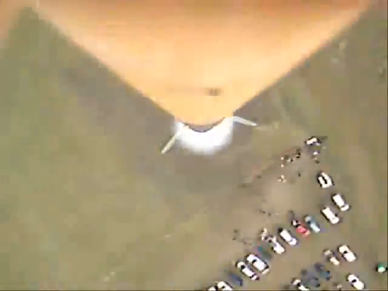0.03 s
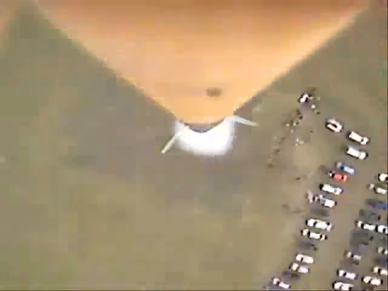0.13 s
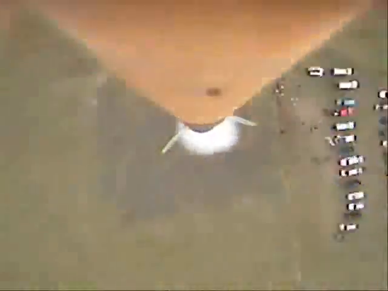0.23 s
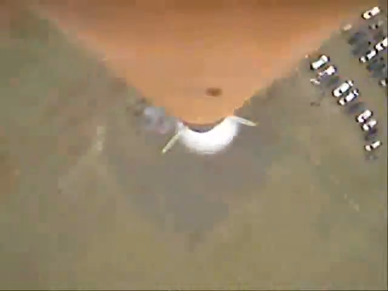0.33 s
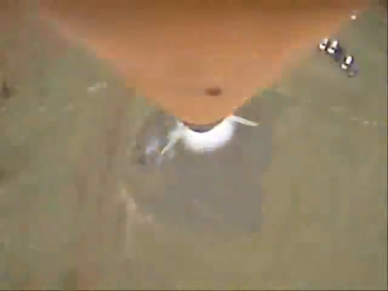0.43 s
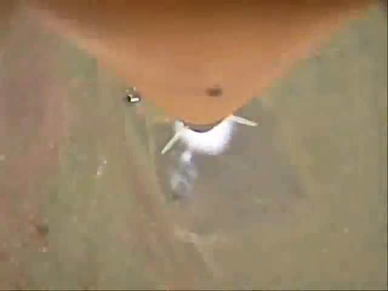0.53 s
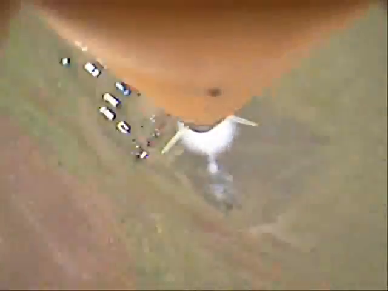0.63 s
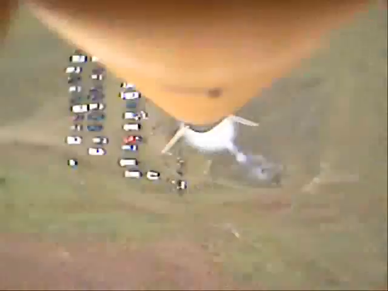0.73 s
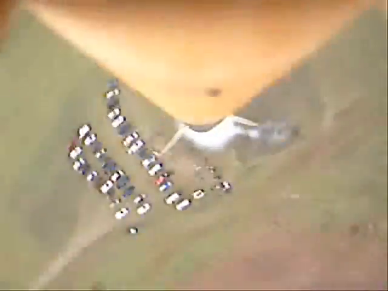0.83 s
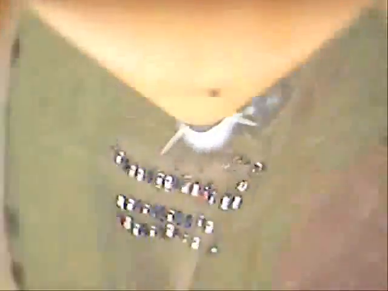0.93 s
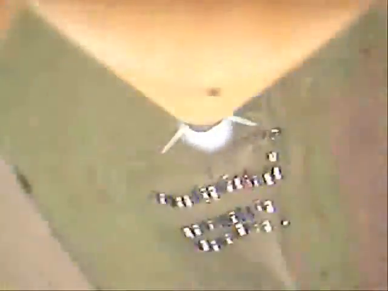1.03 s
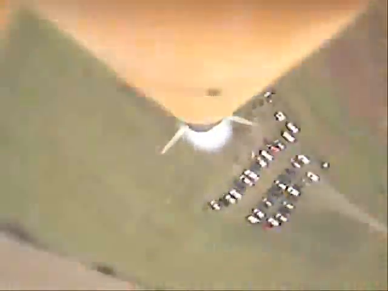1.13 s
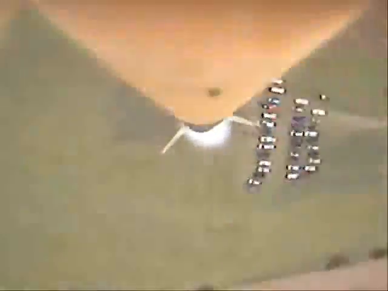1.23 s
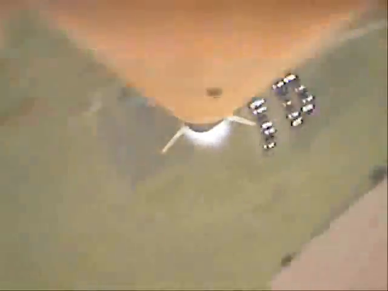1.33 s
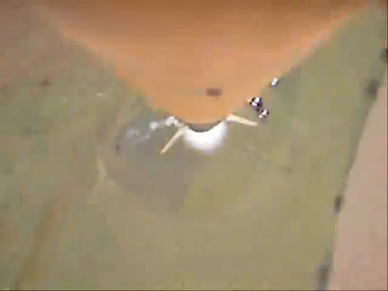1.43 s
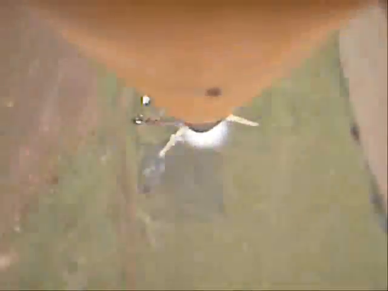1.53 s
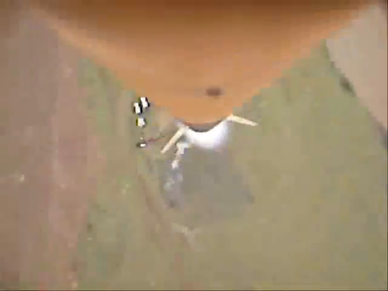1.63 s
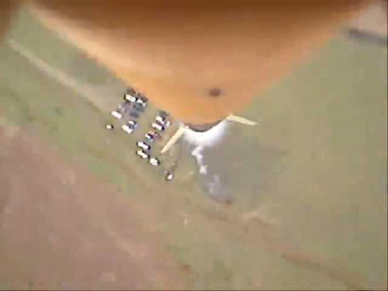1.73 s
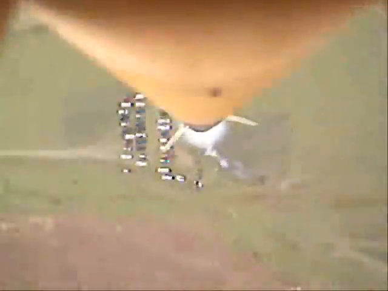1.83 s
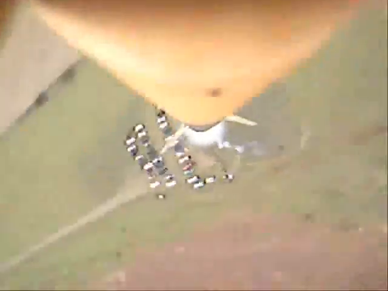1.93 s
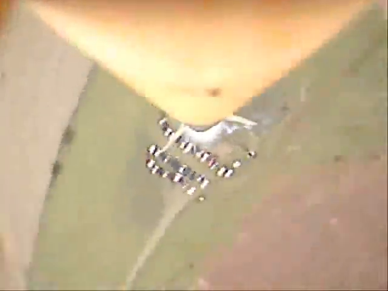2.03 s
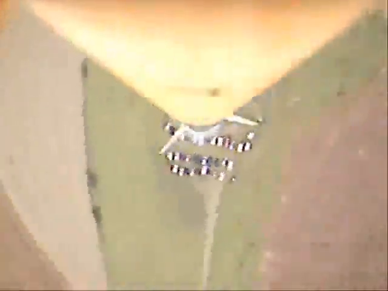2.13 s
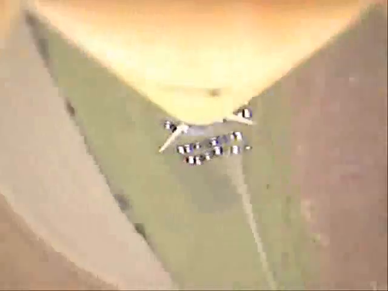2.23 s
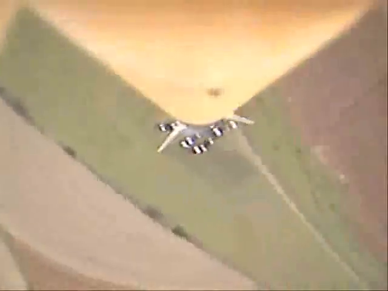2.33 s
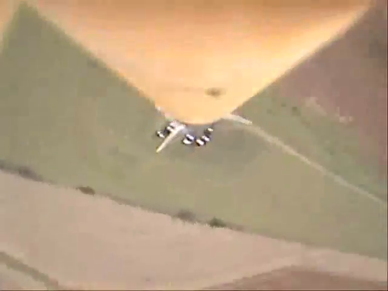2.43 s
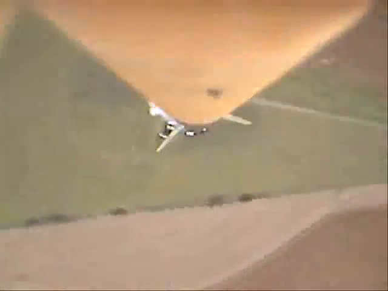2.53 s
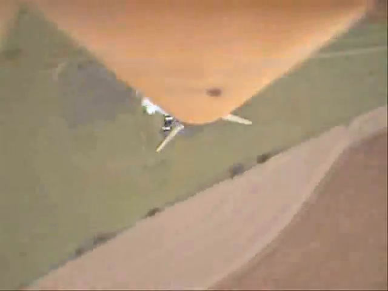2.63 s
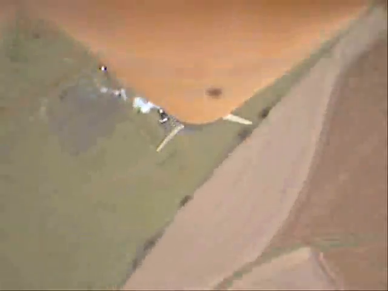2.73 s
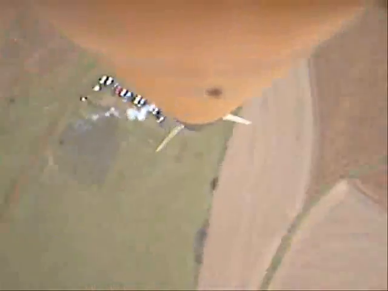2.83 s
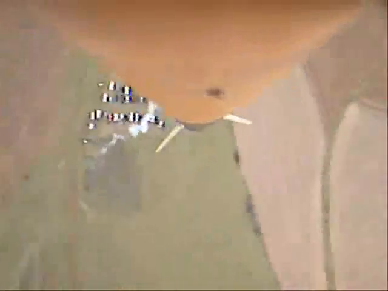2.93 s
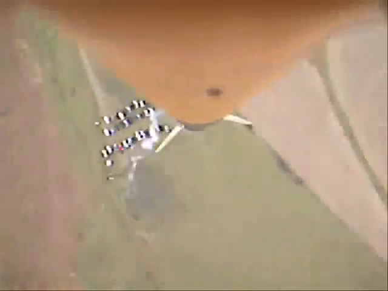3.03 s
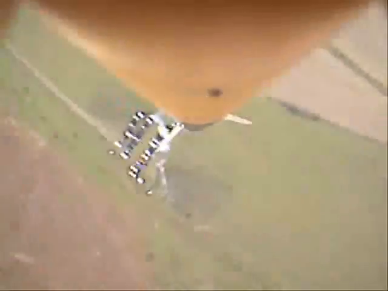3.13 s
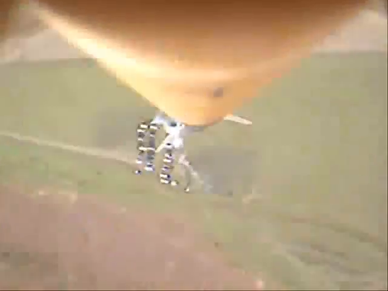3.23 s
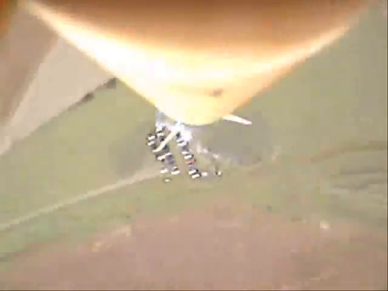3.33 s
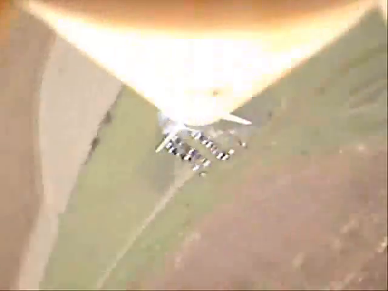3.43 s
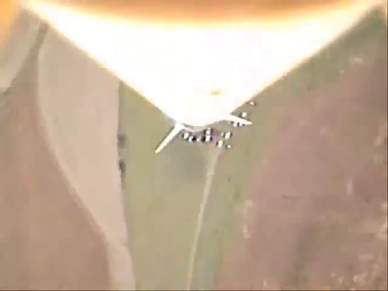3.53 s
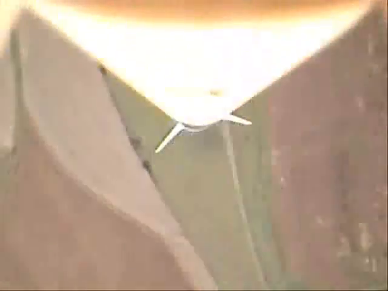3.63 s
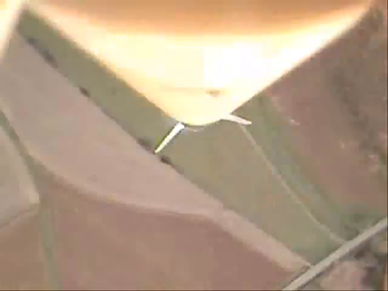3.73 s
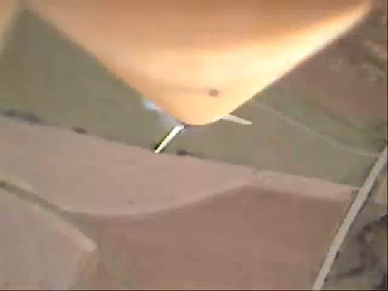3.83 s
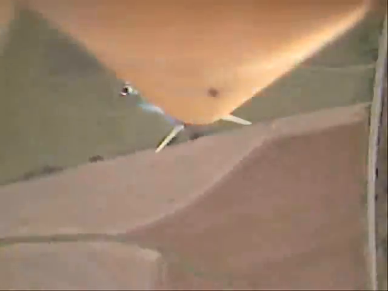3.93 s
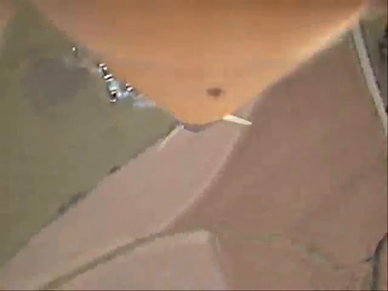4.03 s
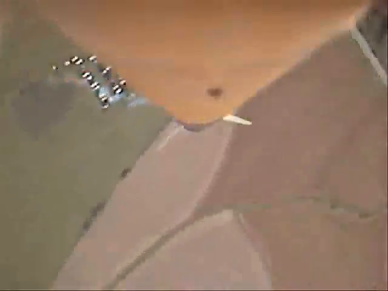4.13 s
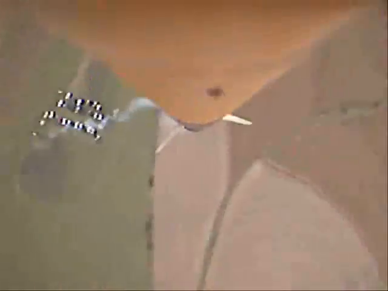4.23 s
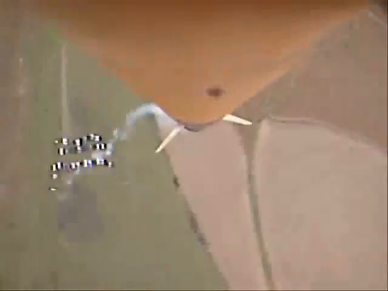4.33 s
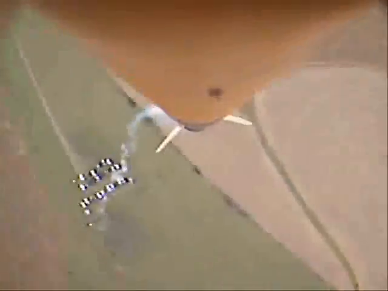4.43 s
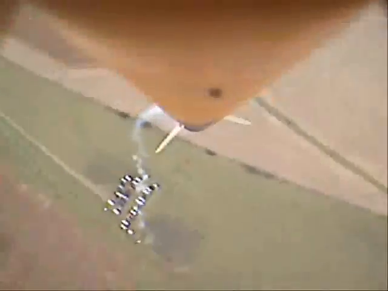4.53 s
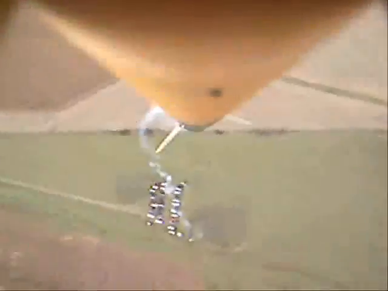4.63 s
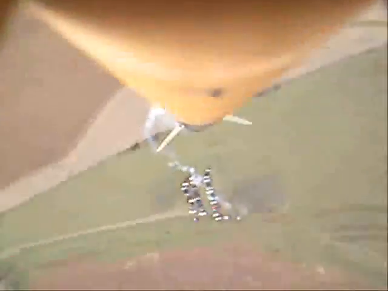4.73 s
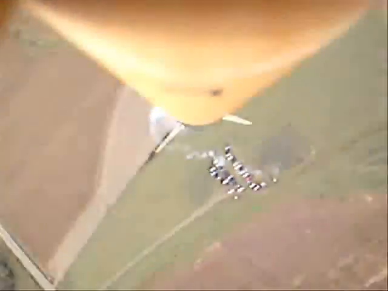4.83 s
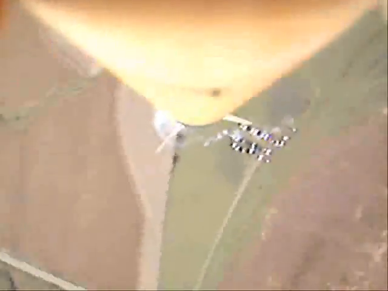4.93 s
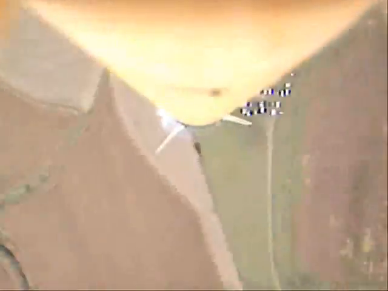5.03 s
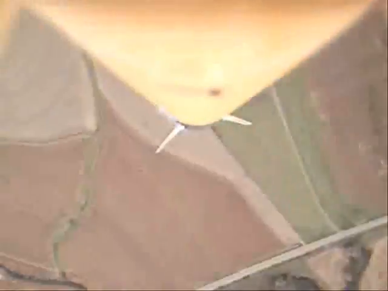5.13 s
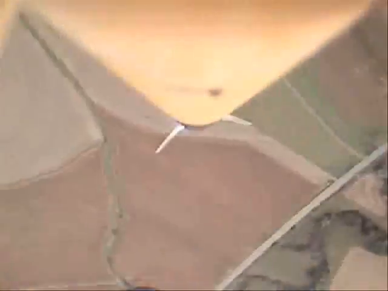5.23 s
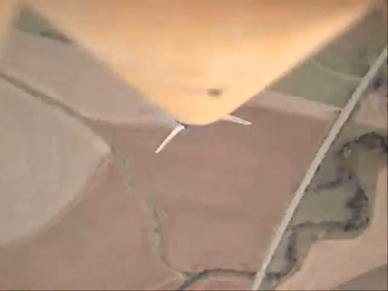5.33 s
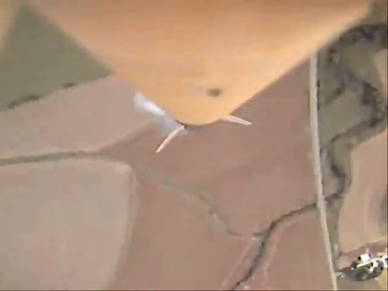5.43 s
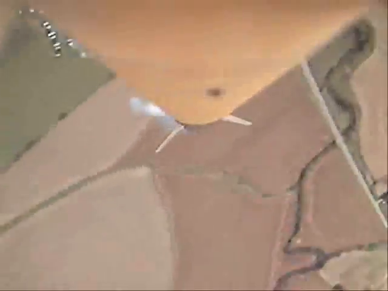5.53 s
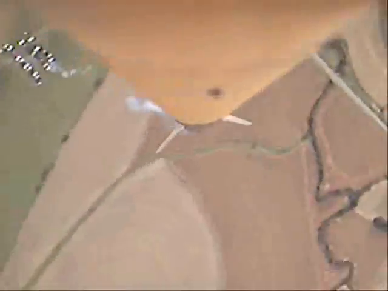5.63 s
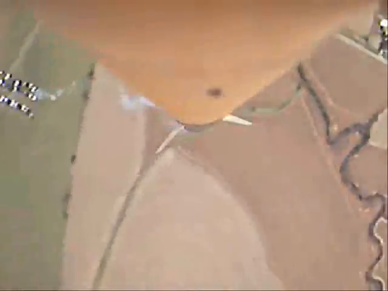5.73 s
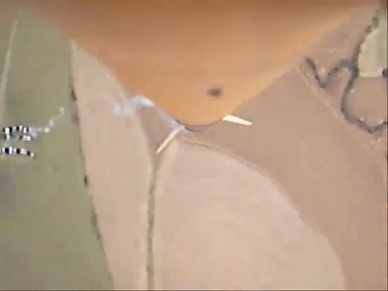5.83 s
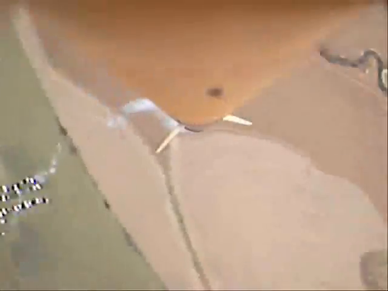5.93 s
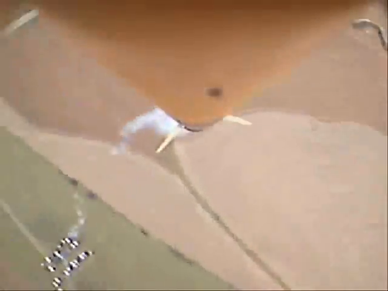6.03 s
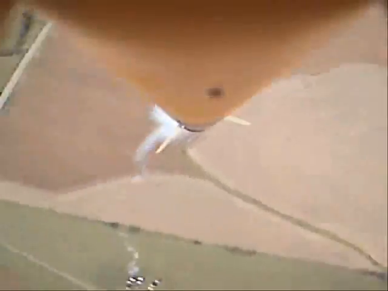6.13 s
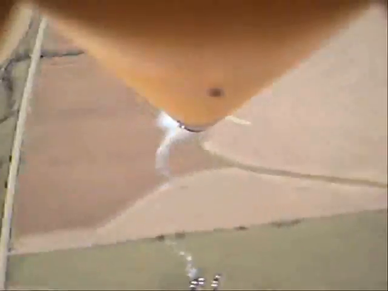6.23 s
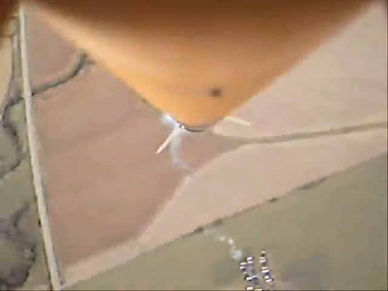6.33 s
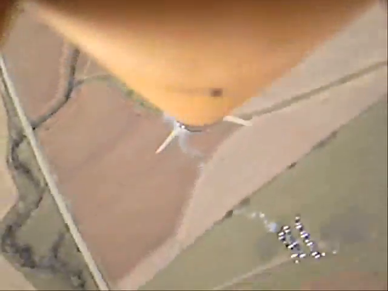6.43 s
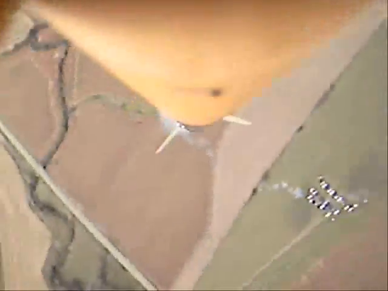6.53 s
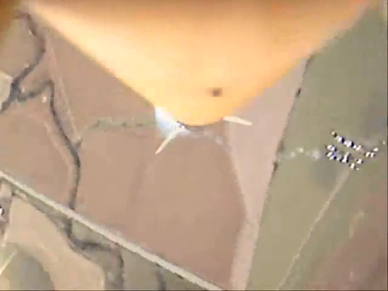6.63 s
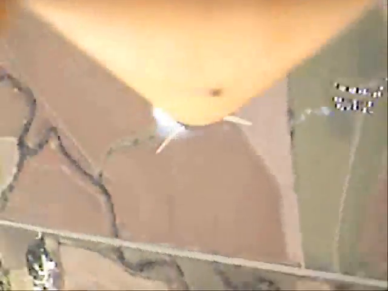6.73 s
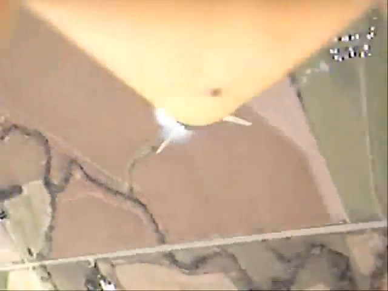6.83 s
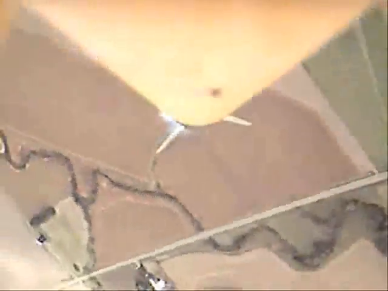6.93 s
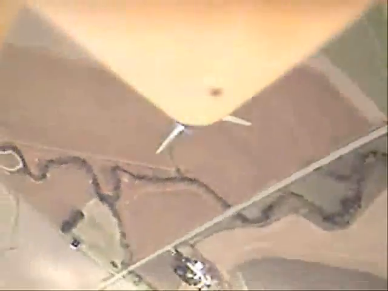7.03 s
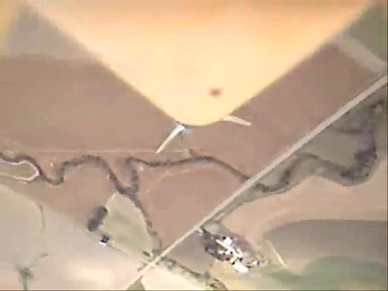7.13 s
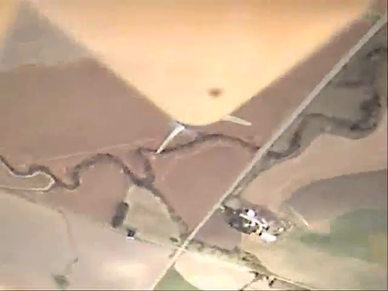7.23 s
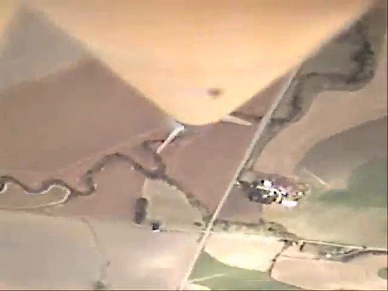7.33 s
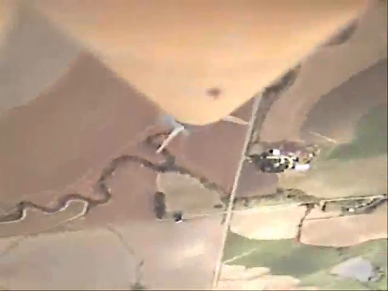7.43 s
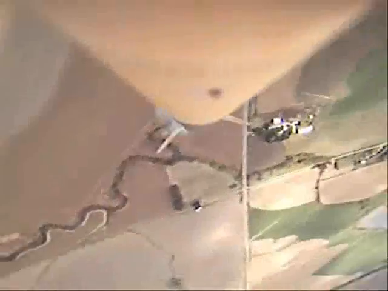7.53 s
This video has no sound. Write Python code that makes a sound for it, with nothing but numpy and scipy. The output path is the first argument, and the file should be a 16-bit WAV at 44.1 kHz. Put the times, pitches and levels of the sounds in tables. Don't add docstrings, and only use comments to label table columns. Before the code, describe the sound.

Harsh low rumble of rushing air with gritty digital fizz, strongest early, fading after burnout to softer buffeting broken by irregular thumps and crackles.

```python
import sys
import numpy as np
from scipy import signal
from scipy.fft import rfft, irfft, next_fast_len
from scipy.io import wavfile
from scipy.ndimage import uniform_filter1d

SR = 44100
rng = np.random.default_rng(int(sys.argv[2]) if len(sys.argv) > 2 else 0)


def convert_level_to_amplitude(level_db):
    exponent = np.asarray(level_db, float) / 20
    return 10 ** exponent


def log_audio(samples):
    frames = np.atleast_2d(samples).T
    limited = np.clip(frames, -1, 1)
    pcm = np.round(limited * 32767).astype(np.int16)
    wavfile.write(sys.argv[1], SR, pcm)


N = 334719
CRUISE_DB = -30


def evened(x):
    return x / np.sqrt(np.mean(x ** 2) + 1e-20)


def coloured(points):
    hz, db = np.transpose(points)
    size = next_fast_len(N)
    bins = np.fft.rfftfreq(size, 1 / SR)
    shape = convert_level_to_amplitude(np.interp(np.log(bins + 1), np.log(hz + 1), db))
    white = rfft(rng.standard_normal(size))
    return evened(irfft(white * shape, size)[:N])


def gusts(hz, depth_db):
    wander = coloured([(0, 0), (hz, -3), (4 * hz, -24), (SR / 2, -120)])
    return evened(convert_level_to_amplitude(depth_db * wander))


def ringing(modes):
    out = np.zeros(N)
    for hz, width, db in modes:
        b, a = signal.iirpeak(hz, hz / width, SR)
        once = signal.lfilter(b, a, rng.standard_normal(N))
        out += convert_level_to_amplitude(db) * evened(signal.lfilter(b, a, once))
    return out


def airflow():
    # t/s, pressure level at the port/dB, cross-flow level from yaw/dB
    flow = [(0, -30.5, -2), (.4, -30.5, 0), (.65, -29.5, 1), (1.0, -27.5, -0.5), (1.6, -27.5, -1),
            (2.2, -27, 1), (2.65, -28.5, -2), (3.0, -29.5, 1), (3.399, -32, 0), (3.9, -34, -1),
            (4.4, -36.5, -.5), (5.0, -39, -0.5), (5.6, -41, 0.5), (6.2, -41, 0), (6.6, -41.5, -0.5),
            (6.95, -46, 3.5), (7.2, -41, -0.5), (7.59, -42.5, 0)]
    s, port_db, yaw_db = np.transpose(flow)
    t = np.arange(N) / SR
    return np.interp(t, s, port_db), np.interp(t, s, yaw_db)


def buffeting():
    # f/Hz, level per Hz/dB
    eddies = [(3, -18.5), (12, -8), (30, -3.5), (80, -2.5), (140, -8), (162, -26), (330, -41), (900, -52.5),
              (1300, -53.5), (2400, -64), (4000, -67), (9000, -80)]
    # f/Hz, bandwidth/Hz, level/dB
    tube = [(118.4, 39, -6.5), (234.5, 45, -17.5)]
    return evened(coloured(eddies) + ringing(tube) * gusts(hz=8, depth_db=1.0))


def hood_wake(port_db, yaw_db):
    # f/Hz, bandwidth/Hz, level/dB
    vortices = [(225.7, 56, 0.5), (186.7, 45, 0), (297.4, 150, -10)]
    excess_db = port_db - CRUISE_DB
    flank_gain = convert_level_to_amplitude(0.38 * excess_db)
    shed = 0.6 * (ringing(vortices[:1]) + flank_gain * ringing(vortices[1:]))
    drive_db = 0.65 * excess_db + 1.2 * yaw_db
    return convert_level_to_amplitude(1.3 * drive_db - 11.5) * shed * gusts(hz=9.3, depth_db=1.5)


def camera_bay(port_db, yaw_db):
    # f/Hz, bandwidth/Hz, level/dB
    cavity = [(481.9, 41, -4), (453, 110, -3.5), (546.7, 130, 0), (737, 200, -12.5)]
    bay_db = -21.5 + 0.6 * (port_db - CRUISE_DB) - 0.8 * yaw_db
    return convert_level_to_amplitude(bay_db + 3.5) * evened(ringing(cavity)) * gusts(hz=39.0, depth_db=2.5)


def microphone_port(port_db):
    # f/Hz, bandwidth/Hz, level/dB
    orifice = [(1729, 390, 0.5), (2012, 300, -6.5), (2776, 490, -16.5)]
    return convert_level_to_amplitude(port_db + 5.0) * evened(ringing(orifice)) * gusts(hz=62.7, depth_db=1.5)


def fine_turbulence(port_db, buffet):
    # f/Hz, bandwidth/Hz, level/dB
    fine = [(2723, 330, -4), (1162, 800, 10), (3580, 2000, -1)]
    on_crests = evened(convert_level_to_amplitude(3.2 * np.clip(buffet, -3, 3)))
    level = convert_level_to_amplitude(1.25 * (port_db + 31.5) - 35.0)
    return level * evened(ringing(fine)) * on_crests * gusts(hz=146, depth_db=1.5)


def slipstream():
    port_db, yaw_db = airflow()
    buffet = buffeting()
    flow_db = -8 + 0.4 * (port_db - CRUISE_DB) + 0.6 * yaw_db
    pressure_db = 1.3 * (flow_db + 11) - 6.0
    cavities = camera_bay(port_db, yaw_db) + microphone_port(port_db)
    shared_gust = gusts(hz=19, depth_db=1.0)
    return (convert_level_to_amplitude(pressure_db) * buffet + hood_wake(port_db, yaw_db) + shared_gust * cavities
            + fine_turbulence(port_db, buffet))


def small_slaps():
    burnout_s, slaps_per_s, slots = 3.45, 26, 160
    gap, size, push = rng.standard_normal((slots, 3)).T
    s = burnout_s + np.cumsum(np.exp(0.6 * gap - 0.18)) / slaps_per_s
    rows = np.transpose([s, -35.5 + 4.5 * size, -18.5 + 2.5 * push])
    return list(rows[s < N / SR])


def slaps():
    # t/s, crackle level/dB, push level/dB
    strongest = [(0.029, -31, -5), (3.468, -28, -4), (3.5114, -23, -2.5), (3.668, -30, 1.5),
                 (3.792, -28, -5), (3.987, -28, -2), (4.1485, -33, -13), (4.2156, -31, 0.5),
                 (4.354, -38, -5), (4.3894, -36, 2), (4.594, -34, -7), (4.9265, -32, -3.5),
                 (5.134, -38, -3), (5.2205, -33, -6), (5.453, -30, -0.5), (5.7069, -33, -3),
                 (5.7357, -39, -1.5), (5.7582, -33, -1), (5.8885, -34, -11), (5.9454, -38, -13),
                 (5.9806, -35, -4), (6.0407, -38, -9), (6.1389, -29, -8), (6.2398, -29, -1.5),
                 (6.3759, -34, -11), (6.6363, -25, -5), (6.7961, -26, -3.5), (6.907, -30, -8),
                 (7.062, -35, -6), (7.5572, -28, 0)]
    out = np.zeros(N + SR)
    t = np.arange(900) / SR
    b, a = signal.iirpeak(2700, 5.5, SR)
    for s, crackle_db, push_db in list(strongest) + small_slaps():
        noise = rng.standard_normal(len(t))
        push = convert_level_to_amplitude(push_db + 3) * (t / 0.002) * np.exp(1 - t / 0.0023)
        rung = signal.lfilter(b, a, noise) + 0.12 * noise
        crackle = convert_level_to_amplitude(crackle_db + 11) * rung * np.exp(-t / 0.0033)
        out[round(s * SR):][:len(t)] += push + crackle
    return out[:N]


def pockets():
    # t at the middle/s, half length/s, depth/dB
    dips = [(0.04, 0.0039, -11), (0.107, 0.0096, -9), (0.166, 0.0036, -2.5), (0.305, 0.0044, -5.5),
            (0.788, 0.0099, -7), (0.912, .003, -4), (0.933, 0.0041, 0), (1.204, 0.0025, -3),
            (1.281, 0.0023, -4), (1.399, 0.005, -2.5), (1.44, 0.0031, -10), (1.93, 0.0073, 0),
            (3.655, 0.005, -7.5), (4.022, 0.01, -4.5), (4.662, 0.007, -4.5), (5.026, 0.015, -5.5),
            (5.089, 0.0047, -22), (5.173, 0.0065, -1.5), (5.265, 0.012, -7), (6.274, 0.013, -5.5),
            (7.383, 0.0075, -12)]
    t = np.arange(N) / SR
    return -sum(convert_level_to_amplitude(db + 5.5) * np.exp(-((t - s) / half) ** 4) for s, half, db in dips)


def scene():
    return (slipstream() + slaps() + pockets())[None]


def capsule(p, bias=0.28, knee=0.45, ceiling=2.08, corner=3.5):
    opened = knee * np.logaddexp(0, (p + bias) / knee)
    return opened / (1 + (opened / ceiling) ** corner) ** (1 / corner)


def slow_converter(x, edge_hz):
    holds_per_s, steps = 8000, 128
    coarse = np.round(x * steps) / steps
    slot = np.floor(np.arange(N) * holds_per_s / SR)
    held = coarse[:, np.ceil(slot * SR / holds_per_s).astype(int)]
    low_pass = signal.firwin(511, edge_hz, window=("kaiser", 8), fs=SR)
    return signal.oaconvolve(held, low_pass[None], "same")


def thinned(x, edge_hz, above_hz=10500):
    hz, _, z = signal.stft(x, SR, nperseg=1024)
    power = uniform_filter1d(abs(z) ** 2, size=3, axis=-1)
    fizz = power[:, (hz > 5000) & (hz < above_hz)].mean(axis=1, keepdims=True)
    patch = uniform_filter1d(power, size=9, axis=-2)
    hz = hz[:, None]
    bar = fizz * convert_level_to_amplitude(2 * (-12.3 - 4.8 * (hz < 12400)))
    faint = (patch < bar) & (hz > above_hz) & (hz < edge_hz)
    return signal.istft(z * ~faint, SR, nperseg=1024)[1][:, :N]


def top_cut(x):
    return signal.sosfilt(signal.butter(12, 16190, fs=SR, output="sos"), x)


def record(dry):
    edge_hz = 15460
    coupled = signal.lfilter(*signal.butter(1, 30, "high", fs=SR), capsule(dry) - 0.5)
    hiss = convert_level_to_amplitude(-62.0) * rng.standard_normal(N)
    clipped = np.clip(convert_level_to_amplitude(-0.02) * coupled + hiss, -1, 1)
    limited = slow_converter(clipped, edge_hz)
    mix = np.clip(thinned(limited, edge_hz), -1, 1)
    return top_cut(mix)


dry = scene()
out = record(dry)
log_audio(out)
```